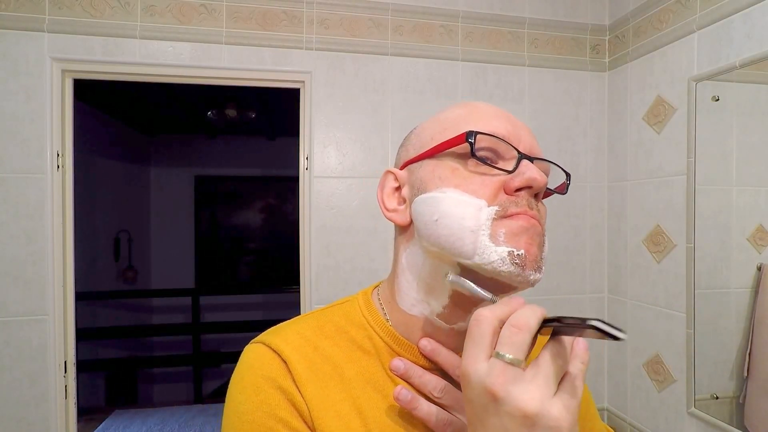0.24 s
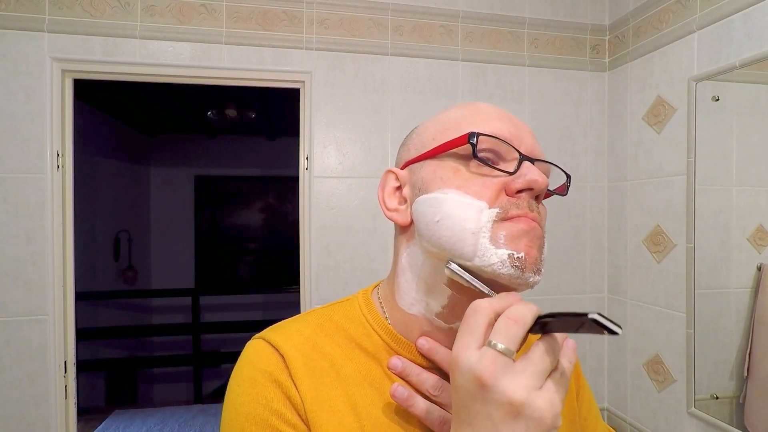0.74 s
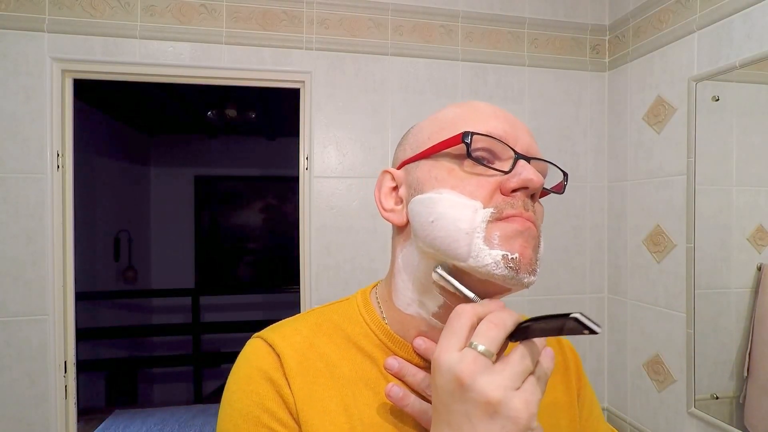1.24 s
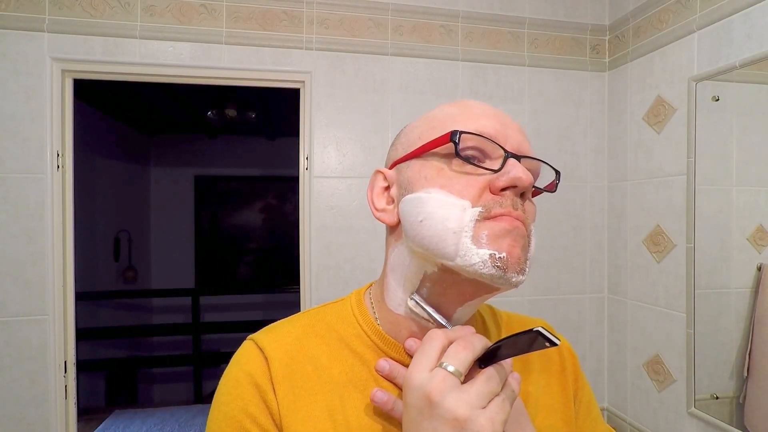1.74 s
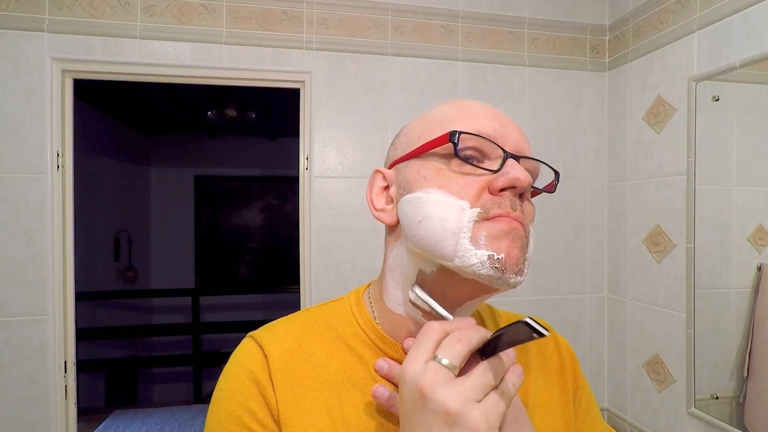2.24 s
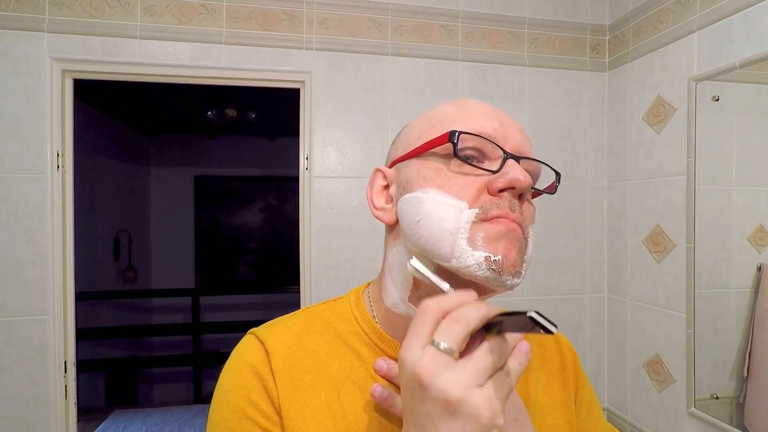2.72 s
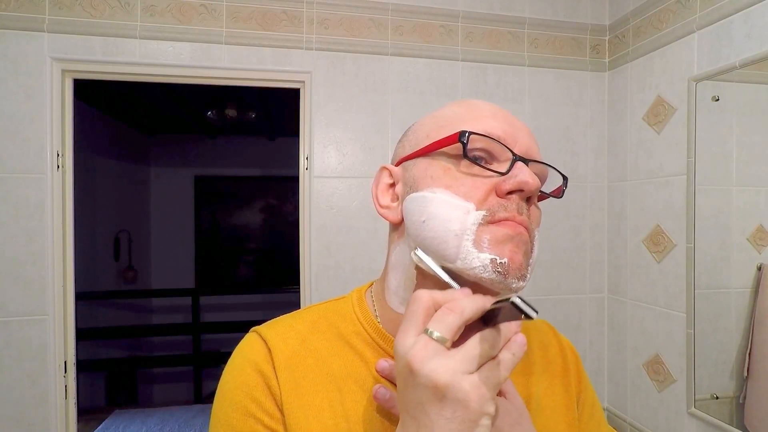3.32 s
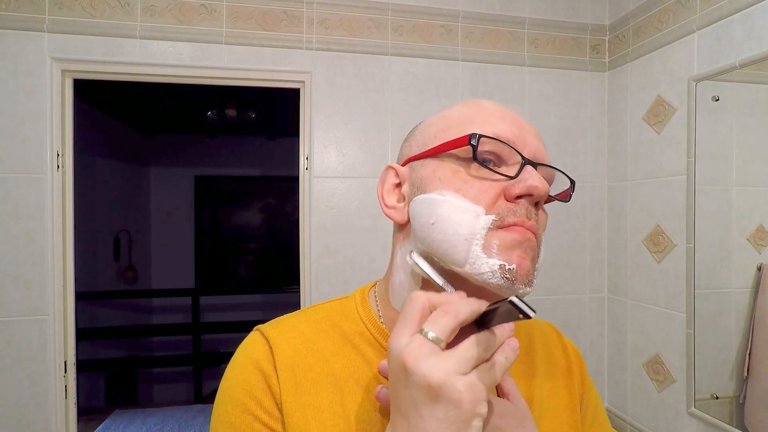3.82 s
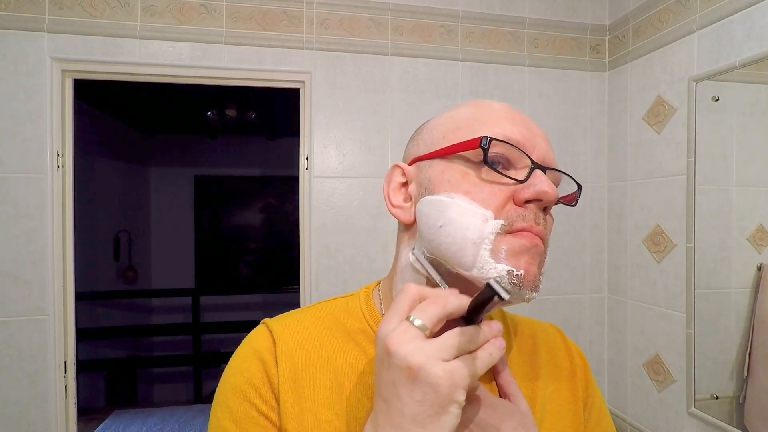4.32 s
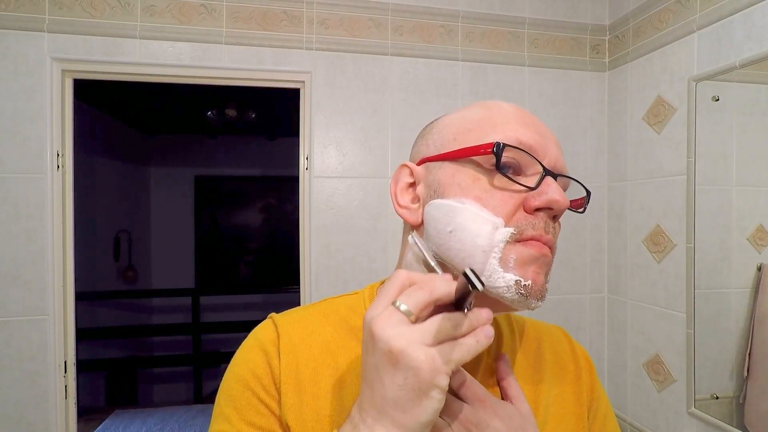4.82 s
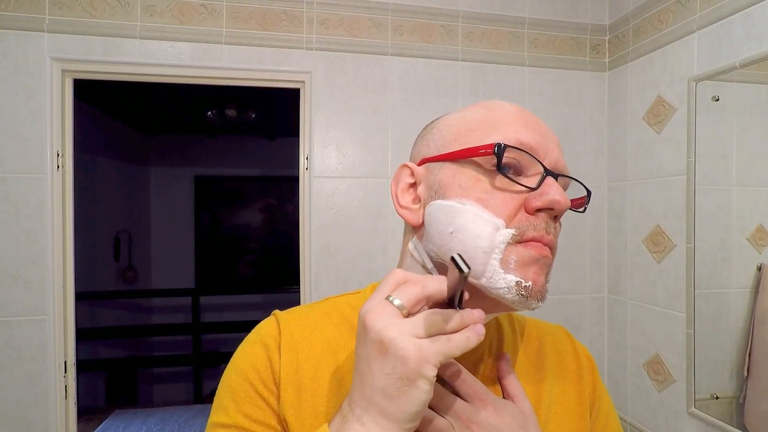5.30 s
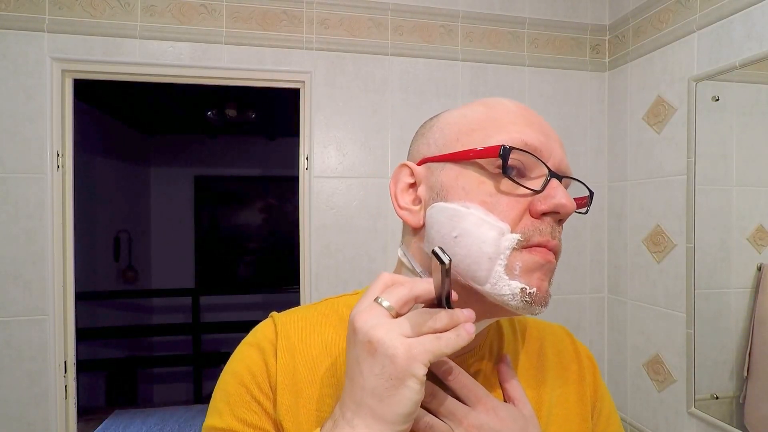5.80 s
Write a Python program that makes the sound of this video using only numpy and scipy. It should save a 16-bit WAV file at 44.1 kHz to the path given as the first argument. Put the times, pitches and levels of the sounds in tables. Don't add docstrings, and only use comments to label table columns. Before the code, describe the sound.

Crisp, dry scraping of a thin blade on whiskers, captured fairly close with a brief reflection from bathroom tiles. Strokes of about a quarter second come and go, full of fine crackles and high metallic ticks, strongest around two seconds. A dull foamy dab interrupts midway, then the strokes weaken until only stray hairs snap as the blade lifts. Constant low microphone noise and a barely audible, throbbing floor hum continue throughout.

```python
import sys
import numpy as np
from scipy import signal
from scipy.fft import rfft, irfft, next_fast_len
from scipy.io import wavfile
from scipy.ndimage import uniform_filter1d, map_coordinates

SR = 44100
rng = np.random.default_rng(int(sys.argv[2]) if len(sys.argv) > 2 else 0)


def persist_wave(psi):
    counts = np.round(np.clip(psi, -1, 1) * 32767).astype(np.int16)
    wavfile.write(sys.argv[1], SR, np.atleast_2d(counts).T)


def natural_amplitude(level_db):
    exponent = np.asarray(level_db, float) / 20
    return 10 ** exponent


N = 266845


def unit(x):
    return x / np.sqrt(np.mean(x ** 2) + 1e-20)


def along(points, hz):
    point_hz, value = np.transpose(points)
    return np.interp(np.log(hz + 1), np.log(point_hz + 1), value)


def curve(points):
    point_s, value = np.transpose(points)
    return np.interp(np.arange(N) / SR, point_s, value)


def wobble(rate):
    knots = rng.standard_normal(int(N * rate / SR) + 4)
    return map_coordinates(knots, [np.arange(N) * rate / SR])


def filtered(x, response):
    m = next_fast_len(N + SR // 2)
    return irfft(rfft(x, m) * response(np.fft.rfftfreq(m, 1 / SR)), m)[..., :N]


def arch(peak_s, rise_s, fall_s):
    t = np.arange(N) / SR - np.reshape(peak_s, (-1, 1))
    return t / np.where(t < 0, np.reshape(rise_s, (-1, 1)), np.reshape(fall_s, (-1, 1)))


def pressure():
    # firmest_s, rise_s, fall_s, middle_scrape_db, lean_toward_edge_db
    strokes = [(.19, 0.17, .125, -61.5, -5), (.54, 0.1, 0.15, -59.5, -4), (.96, 0.14, 0.17, -61, -3),
               (1.36, .11, .12, -62.5, -3), (1.48, 0.11, 0.061, -62.5, -6),
               (1.562, 0.024, 0.049, -63, -5.5), (1.65, 0.047, .06, -70.5, -7),
               (1.75, 0.097, 0.097, -62.5, -5.5), (1.867, .02, 0.037, -72.5, -1),
               (2.24, 0.16, 0.12, -59, -3.5), (2.3, .04, 0.041, -64, 4.5), (2.61, 0.083, .11, -61, 0),
               (3.11, 0.18, 0.079, -63, 0), (3.372, .045, 0.052, -68, -3),
               (3.445, 0.069, 0.05, -61.5, -2.5), (3.725, 0.076, 0.11, -62, -1.5),
               (4.09, 0.069, 0.074, -64, -4.5), (4.39, 0.066, 0.14, -65.5, 0),
               (4.75, 0.13, 0.075, -66.5, 2), (5.085, .14, 0.077, -65, 3), (5.4, 0.088, 0.083, -66, 2),
               (5.76, 0.056, 0.06, -72, 6), (5.83, .04, .06, -76, 6), (6.05, 0.011, .03, -74, 3.5)]
    # heel_db, tip_db, wrist_roll_onto_edge_db (start to end)
    grip = [(0.5, 1.5, 5), (0.5, 0, 3), (-2, -1.5, 0), (-1.5, -3, -1), (3.5, 0, -1), (1, -1, 0), (-1, 1, 0),
            (2.5, -0.5, -2), (0, 3, 0), (0, -1, -2), (0.5, -1, 1), (-1, -2, -1), (0, -3, 0), (3, -3, 3.5),
            (-0.5, -1, -6), (-0.5, -1, 0), (-2, 0, 2), (-1, -3, 0), (-1, -2, 3), (1, -1, 3), (0, 2.5, 2),
            (-3, -2, -1), (2, 1, 0), (0, 0, 0)]
    fade_db, roundness = 26, 2.68
    catch_db, catch_per_s = 1.25, 35
    firmest_s, rise_s, fall_s, scrape_db, lean_db = np.transpose(strokes)
    place = arch(firmest_s, rise_s, fall_s)
    each_db = scrape_db[:, None] - fade_db * np.minimum(np.abs(place), 3) ** roundness
    lead = each_db.argmax(axis=0)
    lead_place = np.clip(place[lead, np.arange(N)], -1, 1)
    held = np.vstack([lean_db[lead], np.transpose(grip)[:, lead], lead_place])
    middle_db = each_db.max(axis=0) + catch_db * wobble(catch_per_s)
    return middle_db, *uniform_filter1d(held, size=400, axis=1)


def stubble(per_s, spread_db, clump_db, colour_db, slide, count):
    chance, size, sign = rng.random((3, N))
    share = np.clip(per_s / SR * natural_amplitude(clump_db * wobble(70)), 1e-4, 1)
    force = (chance < share) * natural_amplitude(-spread_db * np.log(size + 0.076)) * np.sign(sign - 0.5)
    force /= (per_s / SR) ** 0.5
    spot = np.clip(rng.standard_normal((count, N)), -1.5, 1.5)
    rub = slide * rng.standard_normal((count, N)) * force.std()
    parts = force * natural_amplitude(colour_db * spot) + rub
    return parts / parts.std(axis=1, keepdims=True)


def ringing(x, modes, tilt_db=0):
    centre, width, db = np.transpose(modes)[:, :, None]

    def gains(f):
        damping = 1j * f * width
        return natural_amplitude(db) * (damping / (centre * centre - f * f + damping)) ** 2

    tilt = natural_amplitude(tilt_db * np.array([wobble(21.08) for _ in modes]))
    power = natural_amplitude(2 * db) * width
    drive = x * tilt / np.sqrt((power * tilt ** 2).sum(axis=0) / power.sum())
    mean = np.mean(np.abs(gains(np.linspace(0, SR / 2, 8000)).sum(axis=0)) ** 2)
    return filtered(drive, gains).sum(axis=0) / np.sqrt(mean)


def razor():
    # start_s, middle_peak_db, edge_db, tip_db (both above the middle)
    thick_hairs = [(0.081, -52, -10, -11), (0.0983, -44.5, -18, -15), (0.1361, -49, -16, -9.5),
                   (0.4628, -54, -15, -13), (0.4878, -55, -13, -7), (0.5033, -44, -16, -10),
                   (0.5551, -47, -10, -10), (1.0056, -50, -11, -11), (1.3375, -50, -10, -12),
                   (1.4227, -50, -16, -21), (1.435, -43.5, -13, -13), (1.475, -49, -20, -16),
                   (1.4955, -42, -20, -18), (1.5577, -44.5, -19, -27), (1.5966, -51, -17, -9),
                   (1.6591, -47, -20, -17.5), (1.7113, -52, -12, -12), (1.7275, -47, -16, -11),
                   (1.7679, -47, -16, -18), (1.863, -50, -16, -13), (2.1106, -56, -8, -11),
                   (2.1814, -45, -9, -5), (2.2267, -43, -15, -15), (2.265, -37, -15, -16),
                   (2.551, -49, -11, -13), (2.575, -50, -5, -7), (2.6309, -50, -9, -10),
                   (3.1315, -48, -14, -15), (3.3608, -49, -13, -15), (4.07, -47, -16, -18)]
    # start_s, peak_db, tip_db (above the edge)
    fine_hairs = [(0.8969, -49, 0), (0.9354, -50, 0), (1.272, -50, 0), (1.3019, -54, 0), (1.3583, -48, 2),
                  (1.4351, -49, 0), (1.505, -49, 0), (2.142, -45, -2), (2.1584, -49, 0), (2.1919, -43, 0),
                  (2.2932, -41, 2), (2.655, -47, 2), (3.0106, -49, -2), (3.0345, -51, 4), (3.0774, -52, 0),
                  (3.3654, -51, 0), (3.4024, -51, 0), (3.4321, -47, -3), (3.4464, -49, 0), (3.7085, -47, 0),
                  (3.7324, -43, 3.5), (4.3794, -45, -3), (4.455, -47, 0), (4.7481, -49, 0),
                  (5.0814, -44, 0), (5.3832, -54, 2), (5.4274, -51, 0), (5.4779, -47, 0), (5.7564, -49, 0),
                  (5.8391, -53, 0),
                  (5.7149, -61, 2), (5.7294, -57, 3), (5.8074, -56, 3), (5.8232, -56, 1), (5.901, -61, 3),
                   (5.9234, -54, 3), (6.0464, -55, -1)]
    # centre_hz, width_hz, level_db
    heel_modes = [(3670, 1300, -14), (4045, 330, -8.5)]
    # centre_hz, width_hz, level_db
    middle_modes = [(5520, 360, -11), (5530, 92, -6), (5580, 1500, 5), (6260, 100, 3), (6250, 1700, 8.5),
                    (6550, 130, 3), (7120, 780, -6)]
    # centre_hz, width_hz, level_db
    edge_modes = [(9600, 1330, -7.5), (10170, 1020, -2.5), (10600, 2100, -6.5)]
    # centre_hz, width_hz, level_db
    tip_modes = [(12900, 1500, 9), (13800, 1200, -5), (14700, 1300, -8.5)]

    middle_db, lean_db, heel_db, tip_db, roll_db, place = pressure()
    parts_db = [-6.5 + heel_db + 0.65 * lean_db,
                0 * place - 1.6,
                lean_db - 1.1 + roll_db * place,
                -3 + tip_db + 0.53 * lean_db + 0.7 * roll_db * place]
    level = natural_amplitude(middle_db + np.array(parts_db))
    level[0] *= np.clip(level[0] / natural_amplitude(-76), 0.4, 1.3) ** 0.5
    hairs = np.clip(750 * natural_amplitude(0.6 * (middle_db + 63.0)), 250, 3000)
    force = level * stubble(hairs, spread_db=2.5, clump_db=3.5, colour_db=3.5, slide=0.61, count=4)

    tear_s, tear_db = 0.003, -6
    snap_db = (0, 9, 7, 5)
    for (start_s, db, edge, tip), jerks in zip(thick_hairs, rng.random((len(thick_hairs), 3))):
        when = np.round((start_s + tear_s * np.cumsum(jerks) / 2) * SR).astype(int)
        force[:, when] += natural_amplitude(db + tear_db + np.add(snap_db, [0, 0, edge, tip]))[:, None]

    fine_db, fine_top_db, fine_tip_db = 7, -46, -4
    for start_s, db, tip in fine_hairs:
        edge_and_tip_db = np.array([0, tip + fine_tip_db])
        force[2:, round(start_s * SR)] += natural_amplitude(np.minimum(db, fine_top_db) + fine_db + edge_and_tip_db)

    blade = (heel_modes, middle_modes, edge_modes, tip_modes)
    return sum(ringing(f, modes, tilt_db=4.0) for f, modes in zip(force, blade))


def tiles(x, wet_db, gap_s):
    # pitch_hz, t60_s
    decay = [(2000, 0.3), (6000, 0.26), (14000, 0.3)]
    step = SR // 8
    blocks = np.pad(x, (round(gap_s * SR), step))[:(N // step + 1) * step].reshape(-1, step)
    hz, t, z = signal.stft(rng.standard_normal((len(blocks), 3 * step)), SR, nperseg=256)
    dying = z * natural_amplitude(-60 * t / along(decay, hz)[:, None])
    tails = signal.istft(dying, SR, nperseg=256)[1][:, :3 * step]
    tails = tails / np.linalg.norm(tails, axis=1, keepdims=True)
    wet = signal.fftconvolve(blocks, tails, axes=1)
    when = step * np.arange(len(blocks))[:, None] + np.arange(wet.shape[1])
    return natural_amplitude(wet_db) * np.bincount(when.ravel(), wet.ravel())[:N]


def hum():
    # start_s, upper_tone_db
    load = [(0.0, -48.5), (0.05, -50.5), (0.25, -46.5), (0.34, -54.5), (0.44, -38.5), (0.64, -38),
            (1.51, -43), (1.82, -41.5), (2.39, -45.5), (2.78, -45), (2.85, -42.5), (2.93, -44.5),
            (5.44, -42), (5.51, -43.5), (5.98, -41.5), (6.05, -40)]
    # start_s, pitch_hz
    pitch = [(0, 25.85), (1.9, 25.95), (2.1, 25.3), (3.5, 25.5), (6.05, 25.72)]
    lower_hz = 17.02
    upper_lead_s, lower_lead_s = 0.015, 0.027
    upper_hz = curve(pitch)
    upper = np.sin(2 * np.pi * (np.cumsum(upper_hz) / SR + upper_hz[0] * upper_lead_s))
    upper_level = natural_amplitude(curve(load) + 0.7 * wobble(6.5))
    lower = np.sin(2 * np.pi * lower_hz * (np.arange(N) / SR + lower_lead_s))
    surge_place = arch(peak_s=0.61, rise_s=0.16, fall_s=0.23)[0]
    surge = natural_amplitude(-41 - 6.6 * np.minimum(surge_place ** 2, 30))
    idle = natural_amplitude(-81 + 4.5 * wobble(6.2))
    return np.sqrt(2) * (upper_level * upper + (idle + surge) * lower)


def room():
    # pitch_hz, level_db (per Hz)
    spectrum = [(8, -27.5), (30, 0), (60, -3.5), (120, -11.5), (200, -16.5), (500, -23.5), (1000, -27.5),
                (2000, -30.5), (4000, -31.5), (8000, -38), (15500, -46), (21000, -35)]
    # pitch_hz, width_hz, level_db
    fuzzy_tones = [(121.3, 14, -76.5), (503.5, 42, -81)]
    noise = unit(filtered(rng.standard_normal(N), lambda hz: natural_amplitude(along(spectrum, hz))))
    bands = sum(natural_amplitude(db) * ringing(rng.standard_normal(N), [(hz, width, 0)]) for hz, width, db in fuzzy_tones)
    return natural_amplitude(-60 + 2.5 + 0.033 * wobble(4.1)) * noise + bands


def lather():
    # peak_s, rise_s, level_db
    landings = [
        (3.364, .008, -63),
        (3.425, .03, -75),
        (5.752, .045, -66),
    ]
    # centre_hz, width_hz, level_db
    foam = [(3600, 1500, 0)]
    bursts = stubble(per_s=1400, spread_db=7.0, clump_db=1.0, colour_db=-6.0, slide=0.34, count=1)[0]
    peak_s, rise_s, db = np.transpose(landings)
    place = arch(peak_s, rise_s, fall_s=0.065)
    swell = natural_amplitude(db[:, None] - 17 * np.minimum(np.abs(place), 6)).sum(axis=0)
    force = swell * bursts
    force[round(3.3622 * SR)] += natural_amplitude(-35.5)
    return ringing(force, foam)


def scene():
    shave = razor() + lather()
    echo = tiles(shave, wet_db=-5.5, gap_s=0.004)
    return (shave + echo + hum() + room())[None]


def band_limit(x):
    return signal.sosfilt(signal.butter(12, 15640, fs=SR, output="sos"), x)


def record(dry):
    top_hz = 15330
    mix = filtered(dry, lambda hz: hz < top_hz)
    return band_limit(mix)


dry = scene()
out = record(dry)
persist_wave(out)
```